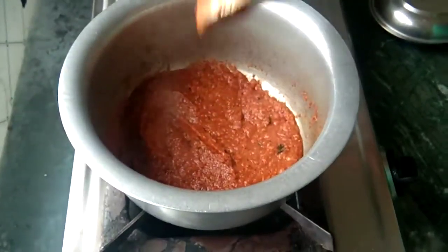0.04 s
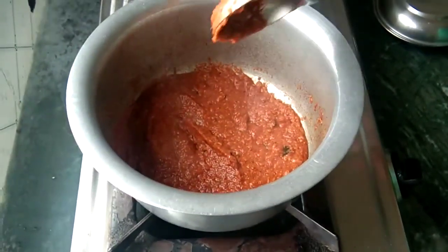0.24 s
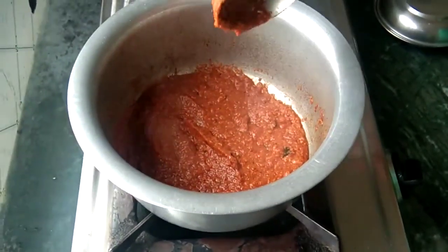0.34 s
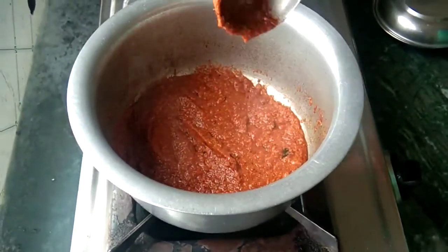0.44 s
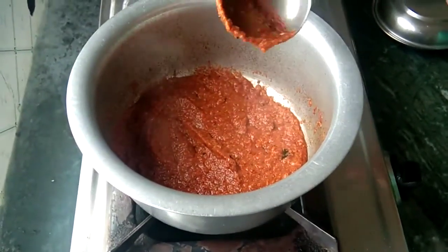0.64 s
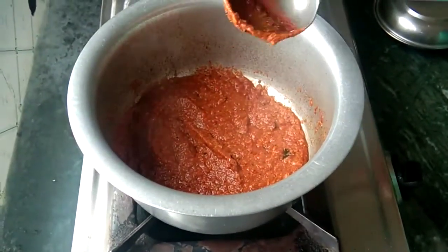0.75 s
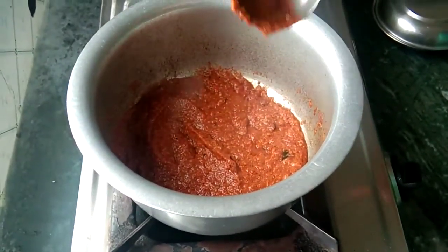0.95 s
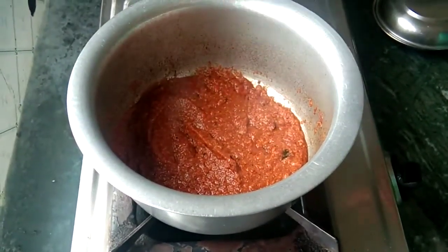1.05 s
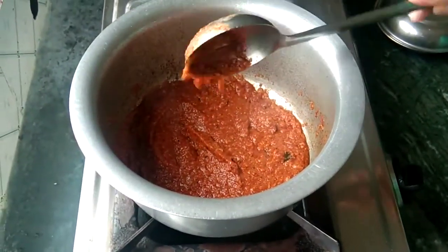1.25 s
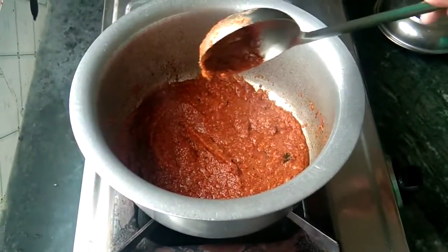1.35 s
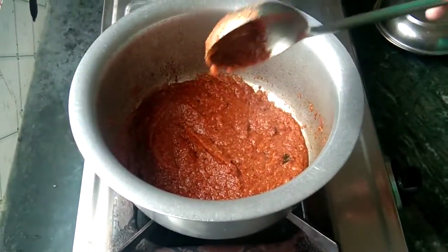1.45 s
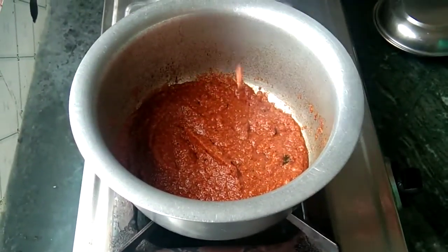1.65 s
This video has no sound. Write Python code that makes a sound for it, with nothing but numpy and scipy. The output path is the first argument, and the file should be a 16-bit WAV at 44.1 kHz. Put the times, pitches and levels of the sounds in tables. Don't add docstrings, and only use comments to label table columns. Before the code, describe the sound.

After a moment of soft sizzling, a sharp metallic knock and short rattling scrape ring through a pot; bubbles keep popping over burner hiss and a faint distant engine drone, recorded close in an echoing kitchen.

```python
import sys
import numpy as np
from scipy import signal
from scipy.io import wavfile
from scipy.ndimage import uniform_filter1d

SR = 44100
rng = np.random.default_rng(int(sys.argv[2]) if len(sys.argv) > 2 else 0)


def volts(x):
    e = np.asarray(x, float) / 20
    return 10 ** e


def wav_out(sig):
    wavfile.write(sys.argv[1], SR, np.round(np.clip(np.atleast_2d(sig).T, -1, 1) * 32767).astype(np.int16))


N = 74970


def read(points, hz):
    f, value = np.transpose(points)
    return np.interp(np.log(hz + 1), np.log(f + 1), value)


def curve(table, col):
    return np.interp(np.arange(N) / SR, np.array(table)[:, 0], np.array(table)[:, col])


def evened(x):
    return x / np.sqrt(np.mean(x ** 2) + 1e-20)


def ring(hz, db, t60, size):
    t = np.arange(size) / SR
    hz, db, t60 = (np.reshape(v, (-1, 1)) for v in (hz, db, t60))
    return (volts(db - 60 * t / t60) * np.sin(2 * np.pi * hz * t)).sum(0)


def colour(points):
    log_gain = np.log(volts(read(points, np.abs(np.fft.fftfreq(4096, 1 / SR)))))
    return np.fft.ifft(np.exp(np.conj(signal.hilbert(log_gain)))).real[:2048]


def noise(points, patchy_db):
    frames, hz = N // 256 + 5, np.fft.rfftfreq(1024, 1 / SR)
    real, imag, patches = rng.standard_normal((frames, 513, 3)).T
    patches = uniform_filter1d(patches, size=10, axis=0)
    patches = evened(uniform_filter1d(patches, size=10, axis=1))
    gain = volts(read(points, hz)[:, None] + patchy_db * patches)
    return evened(signal.istft((real + 1j * imag) * gain, nperseg=1024, noverlap=768)[1][:N])


def clicks(per_s, spread_db):
    chance, size, sign = rng.random((N, 3)).T
    height = volts(spread_db * np.minimum(-np.log(size + 1e-9), 4))
    return (chance < per_s / SR) * height * np.sign(sign - .5)


# t/s, f/Hz, level/dB
DRONE = [(0.0, 124, -62), (0.084, 121.3, -58), (0.264, 110.5, -72), (0.402, 123.5, -62.5),
         (0.804, 121.3, -60.5), (1.026, 127.7, -62), (1.136, 112.4, -58.5), (1.22, 117.1, -69),
         (1.362, 120.8, -50.5), (1.624, 119.0, -56), (1.666, 117.4, -65), (1.7, 118.6, -60)]
# t/s, level/dB
THRUM = [(0.0, -78), (0.156, -100), (0.188, -60.5), (0.464, -59.5), (0.818, -80.5), (1.216, -82),
         (1.4, -61), (1.444, -80), (1.662, -89), (1.7, -91)]


def street():
    thrum_hz, wander_hz = 61.7, 4.0
    wander = evened(uniform_filter1d(rng.standard_normal(N), size=2000))
    thrum = np.sin(2 * np.pi * np.cumsum(thrum_hz + wander_hz * wander) / SR)
    drone = np.sin(2 * np.pi * np.cumsum(curve(DRONE, 1)) / SR)
    return np.sqrt(2) * (volts(curve(DRONE, 2)) * drone + volts(curve(THRUM, 1)) * thrum)


# f/Hz, density/dB per Hz
HISS = [(25, -45), (70, -5.5), (120, 1.5), (220, -8), (500, -7.5), (1050, -13.5), (9000, -60), (15500, -85)]


def burner():
    return volts(-57.5) * noise(HISS, patchy_db=1.5)


# f/Hz, t60/s
ROOM = [(300, 1), (1500, 1), (4000, 0.78), (8000, 0.57), (11000, 0.12), (14000, 0.22)]


def kitchen(x):
    taps = np.zeros(SR)
    at = np.arange(200, SR - 20, 20)
    taps[at + rng.integers(0, 20, len(at))] = rng.choice([-1., 1.], len(at))
    hz, t, z = signal.stft(taps, SR, nperseg=256)
    tail = signal.istft(z * volts(-60 * t / read(ROOM, hz)[:, None]), SR, nperseg=256)[1]
    return signal.fftconvolve(x, tail / np.linalg.norm(tail))[:N]


# f/Hz, density/dB per Hz
STIR = [(1200, -5), (1500, -4), (2600, -11), (3700, 8), (4600, -8), (5600, -14.5), (8000, -57)]


def stir():
    start_db, t60 = -58, .9
    return volts(start_db - 60 * np.arange(N) / SR / t60) * noise(STIR, patchy_db=0.5)


# t/s, peak level/dB, ring f/Hz
POPS = [(.003, -40, 2700), (.0158, -41, 6500), (.0255, -43, 5500), (.0578, -36, 1500), (.068, -42, 5000),
        (.108, -43, 8000), (.0896, -36.5, 2300), (.132, -43, 2300), (.1466, -43, 4000), (.1652, -41, 5000),
        (.691, -37, 2400), (.7748, -35, 6100), (.8042, -37, 2400), (.8085, -36, 7000), (.8341, -39, 5600),
        (.856, -36, 2450), (.9028, -39, 6700), (.911, -37, 1420), (.9375, -39, 6000), (.966, -37, 2300),
        (1.0102, -34, 2450), (1.029, -37, 2500), (1.083, -39, 2500), (1.098, -37, 7000), (1.109, -41, 3300),
        (1.173, -41, 7500), (1.1626, -40, 6100), (1.198, -35, 2400), (1.2505, -40, 2490),
        (1.2905, -39, 5700), (1.2925, -37, 1400), (1.3311, -34, 2400), (1.399, -41, 2400),
        (1.4064, -36, 2500), (1.4365, -40, 3500), (1.4788, -38, 1400), (1.4848, -38, 5900),
        (1.534, -42, 2800), (1.591, -36, 2300), (1.551, -42, 2500), (1.615, -41, 6000), (1.623, -41, 2400),
        (1.6481, -31, 2300), (1.6936, -36, 5500)]
# f/Hz, density/dB per Hz
SIZZLE = [(1000, -14.5), (1900, -11), (2400, -2), (3000, -10), (4600, -16), (6200, -6.5), (8000, -17),
          (9500, -39.5)]


def paste():
    pop_db, pop_t60, snap_db = 1, .008, 5
    spray_db, spray_t60 = -16, .05
    fizz_db, sizzle_db = -59, -56.5
    port = colour(SIZZLE)
    pops, t = np.zeros(N + 6000), np.arange(4000) / SR
    for s, db, hz in POPS:
        spray = rng.standard_normal(4000) * volts(spray_db - 60 * t / spray_t60)
        spray += volts(snap_db) * 2 * (t == 0)
        cavity = colour([(hz / 4, -6), (hz, 0), (hz * 2, -9), (hz * 4, -14)])
        tone = np.convolve(port[:400], cavity[:100])
        x = np.convolve(spray, tone / np.linalg.norm(tone))[:4000]
        x += ring(hz, 0, pop_t60, size=4000) * np.minimum(t / .0004, 1)
        pops[round(s * SR):][:4000] += volts(pop_db + db) * x / np.abs(x).max()
    pops = signal.lfilter(*signal.butter(4, 9000, fs=SR), pops[:N])
    fizz = evened(signal.oaconvolve(clicks(per_s=900, spread_db=3.0), port)[:N])
    return pops + volts(fizz_db) * fizz + volts(sizzle_db) * noise(SIZZLE, patchy_db=2.5)


# f/Hz, level/dB from the blow, level/dB kept up by the drag, t60/s
POT = [(310, -39, -58, .35), (373, -50, -50, .6), (480, -43, -56, .3), (812, -56, -57, 1.5),
       (976, -52, -58, 3.5), (1399, -29.5, -45, .95), (1894.5, -33, -36.5, 1.25), (2175, -46, -45, 1.5),
       (2420, -31, -55, .12), (2520, -40, -47, 1.8), (2688, -33, -48, .2), (2740, -27, -70, .13),
       (2971, -31, -47.5, 1.2)]


def pot():
    hz, blow_db, fed_db, t60 = np.transpose(POT)[:, :, None]
    feed_start, feed_end = .27, .44
    t = np.arange(N) / SR
    since = np.maximum(t - KNOCKS[0][0], 0)
    build_up = np.clip((t - feed_start) / (feed_end - feed_start), 0, 1) ** .5
    fed = build_up * volts(fed_db - 60 * np.maximum(t - feed_end, 0) / np.maximum(t60, .6))
    blow = np.minimum(since / .0015, 1) * volts(blow_db - 60 * since / np.minimum(t60, .6))
    return ((blow + fed) * np.sin(2 * np.pi * hz * since)).sum(0)


def rebound():
    start, hz, db, rise, t60 = .283, 6637, -27, .012, .18
    late = np.maximum(np.arange(N) / SR - start, 0)
    level = np.minimum(late / rise, 1) ** 2 * volts(db - 60 * late / t60)
    return level * np.sin(2 * np.pi * hz * late)


# t/s, level/dB
DRAG = [
    (.2, -68.5),
    (.212, -32.5),
    (.28, -30.5),
    (.3, -31.5),
    (.35, -30.5),
    (.43, -36.5),
    (.46, -40.5),
    (.56, -51.5),
    (.7, -56.5),
    (.85, -73),
]
# f/Hz, level/dB
DRAG_TONE = [(230, -24.5), (700, -8), (1100, -14), (2500, -3.5), (4200, -13.5), (7000, -10), (10000, -34),
             (15500, -51)]


def drag():
    rasp_t60, ring_t60, ring_db = 0.028, .1, 1
    t, out = np.arange(6000) / SR, np.zeros(N)
    train = volts(curve(DRAG, 1)) * evened(clicks(per_s=2000, spread_db=3.0))
    spot = rng.integers(0, 6, N)
    hz = 600 + 7600 * rng.random(160)
    lean = read(DRAG_TONE, hz) + 3 * rng.standard_normal(160)
    soft = np.sin(np.pi / 2 * np.minimum(t / .003, 1)) ** 2 * np.cos(np.pi / 2 * t / t[-1]) ** 2
    for k in range(6):
        grit = rng.standard_normal(6000) * volts(-60 * t / rasp_t60)
        rasp = np.convolve(grit, colour(DRAG_TONE))[:6000]
        mode_db = lean + 3 * rng.standard_normal(160)
        modes = ring(hz, mode_db, ring_t60 * np.sqrt(2500 / hz), size=6000)
        tail = evened(rasp) + volts(ring_db) * evened(modes * soft)
        out += signal.oaconvolve(train * (spot == k), tail / np.linalg.norm(tail))[:N]
    return out


# t/s, strength level/dB, dullness/0-1
KNOCKS = [
    (.2003, 4.5, 0.01),
    (.2115, -7.5, 0.37),
    (.3096, -14, 0.89),
    (.3425, -34, 0.5),
    (.386, -28, 0.95),
    (.398, -24, 0.3),
    (.428, -23, 1),
    (.474, -35.5, 0.38),
]
# f/Hz, level/dB, t60/s
LADLE = [(3180, -30, .45), (3457, -29, .15), (4075, -26, .17), (4412, -31, .3), (4574, -27, .09),
         (5500, -36, .2), (6075, -26, .12), (6553, -17, .08), (6632, -37, .6), (6642, -13, .08),
         (7334, -13, .07), (7490, -20, .1), (7547, -14, .07), (7805, -18, .09)]
# f/Hz, level/dB
SHEET = [(450, -23.5), (1050, -29.5), (2500, -8.5), (4400, -3.5), (5200, -2.5), (7000, 3.5), (9500, -22.5),
         (15500, -70.5)]
# f/Hz, t60/s
SHEET_T60 = [(300, .1), (1500, .07), (4000, .05), (8000, .04), (14000, .03)]


def knocks():
    knock_db, ladle_db, sheet_db = -1.5, 1, -26
    out, t = np.zeros(N), np.arange(24000) / SR
    u = rng.random((400, 2))
    hz = 390 + 15000 * np.sort(u[:, 0]) ** 1.3
    small = read(SHEET, hz) + 6.0 * (u[:, 1] - .5)
    bowl_hz, bowl_db, bowl_t60 = np.transpose(LADLE)
    for k, (s, db, dull) in enumerate(KNOCKS):
        uneven = rng.standard_normal(414) * (k > 0)
        x = ring(bowl_hz, ladle_db + bowl_db + 1.86 * uneven[:14] - 83.0 * dull, bowl_t60, size=24000)
        crowd_db = sheet_db + small + 9.26 * uneven[14:] - 5.4 * dull * np.log2(hz / 2500)
        x[:4000] += ring(hz, crowd_db, read(SHEET_T60, hz), size=4000)
        out[round(s * SR):][:24000] += volts(knock_db + db) * x * np.minimum(t / 0.0019, 1)
    return out


def scene():
    metal, wall = knocks() + drag(), pot() + rebound()
    echo = kitchen(volts(-10.5) * metal + volts(-26) * wall)
    return (metal + wall + echo + paste() + stir() + street() + burner())[None]


def roll_off(x):
    return signal.sosfilt(signal.butter(12, 15950, fs=SR, output="sos"), x)


def record(dry):
    ceiling = 4.0
    cut = signal.lfilter(*signal.butter(2, 45, "high", fs=SR), dry)
    limited = ceiling * np.tanh(cut / ceiling)
    edge = signal.firwin(301, 15620, window=("kaiser", 9), fs=SR)
    mix = signal.oaconvolve(limited, edge[None], "same")
    return roll_off(mix)


dry = scene()
out = record(dry)
wav_out(out)
```